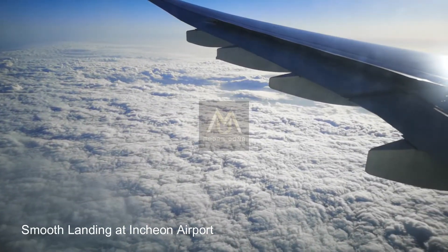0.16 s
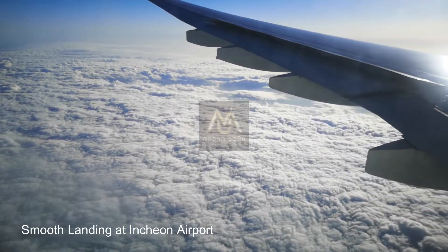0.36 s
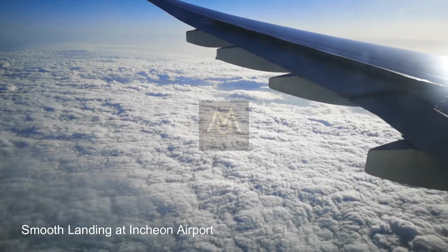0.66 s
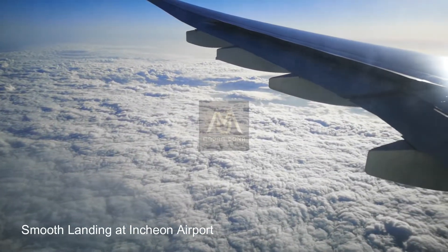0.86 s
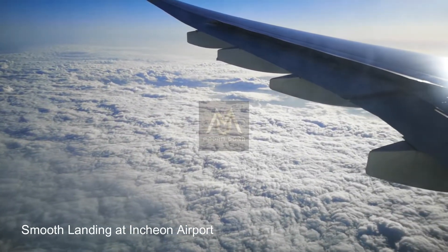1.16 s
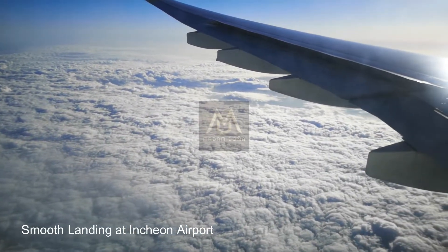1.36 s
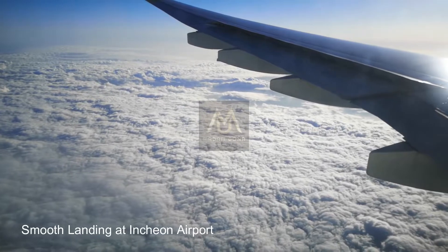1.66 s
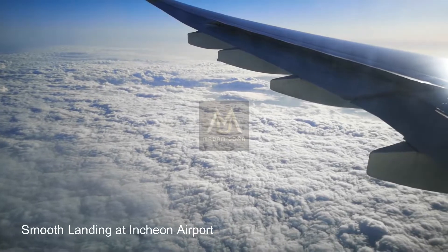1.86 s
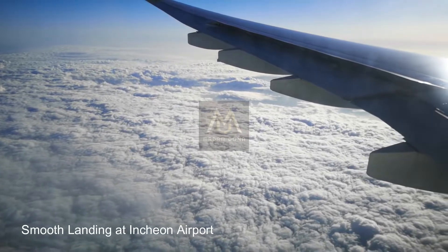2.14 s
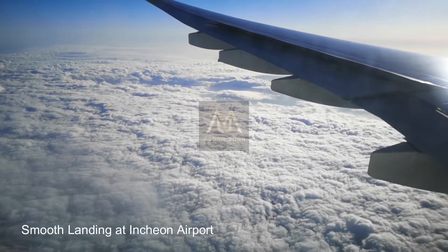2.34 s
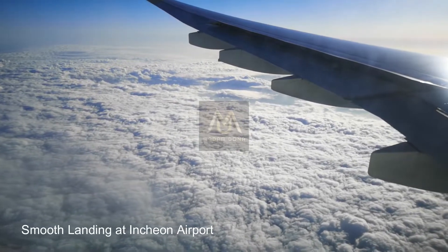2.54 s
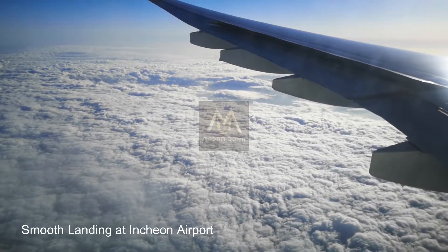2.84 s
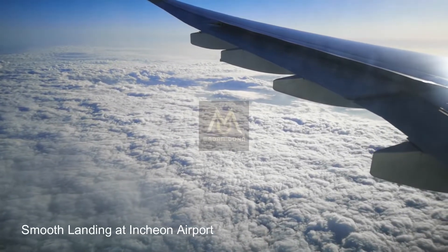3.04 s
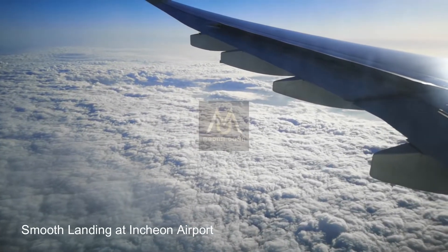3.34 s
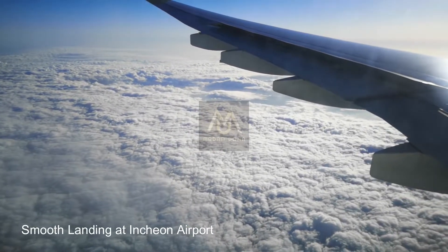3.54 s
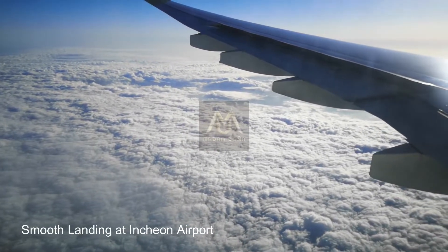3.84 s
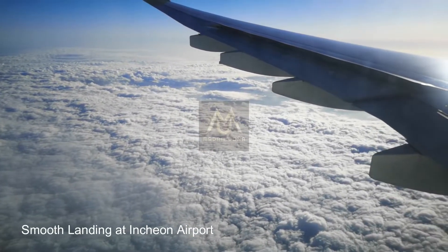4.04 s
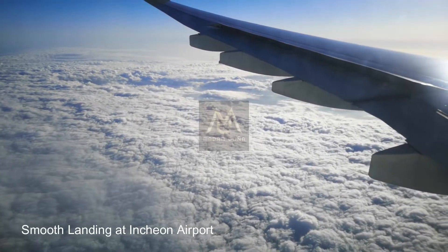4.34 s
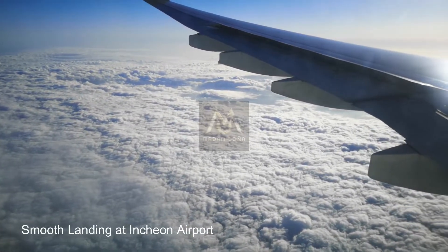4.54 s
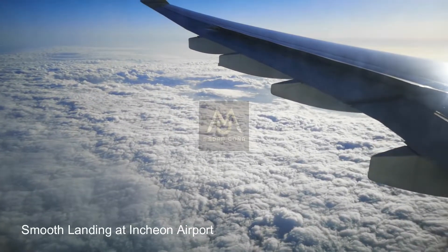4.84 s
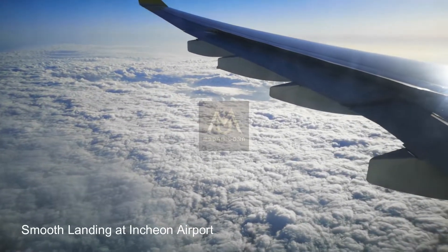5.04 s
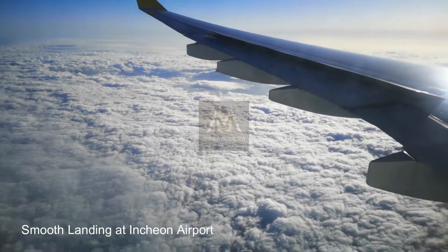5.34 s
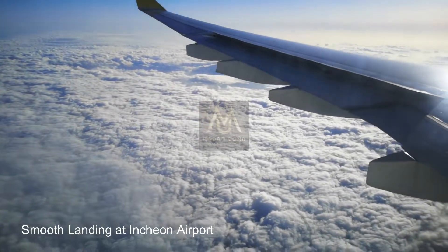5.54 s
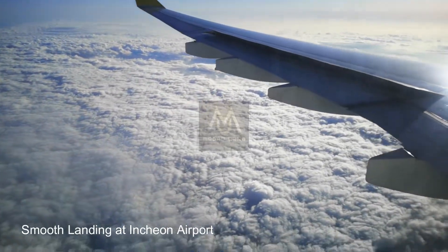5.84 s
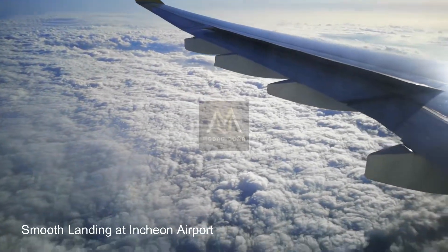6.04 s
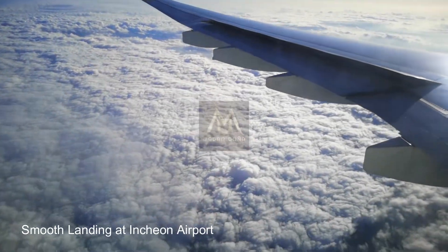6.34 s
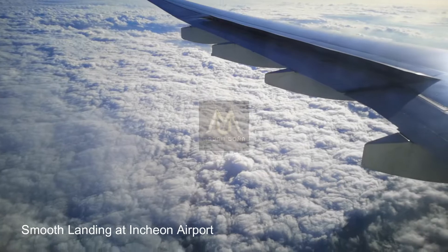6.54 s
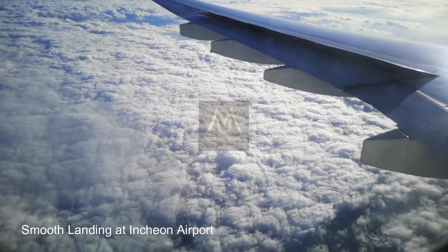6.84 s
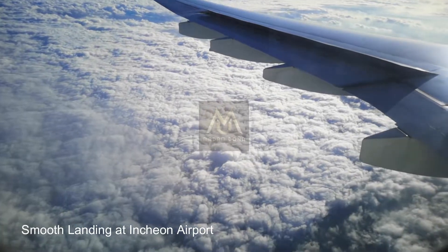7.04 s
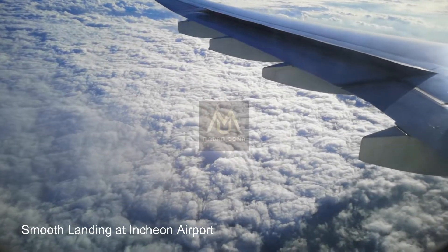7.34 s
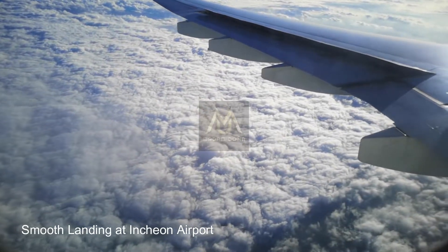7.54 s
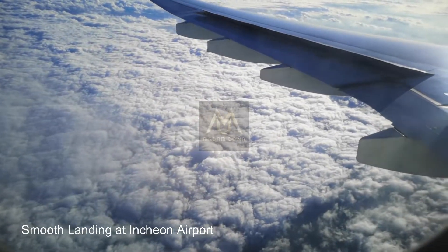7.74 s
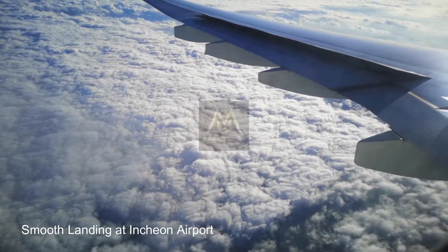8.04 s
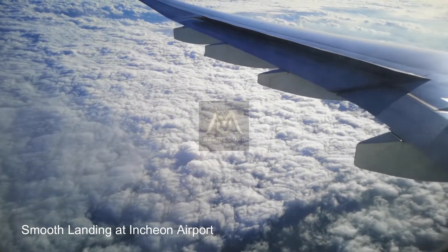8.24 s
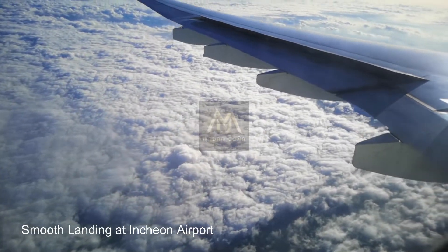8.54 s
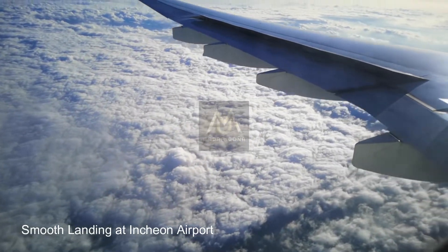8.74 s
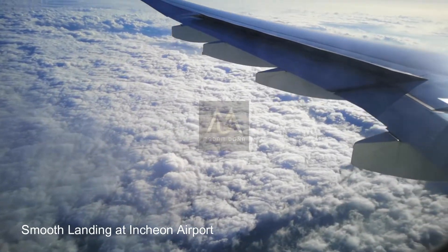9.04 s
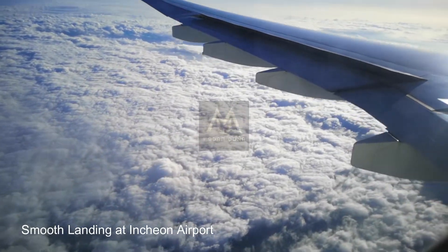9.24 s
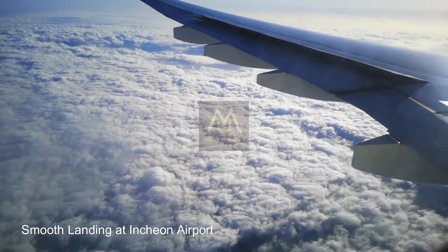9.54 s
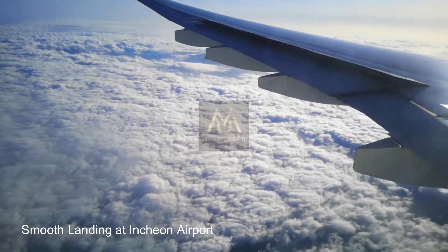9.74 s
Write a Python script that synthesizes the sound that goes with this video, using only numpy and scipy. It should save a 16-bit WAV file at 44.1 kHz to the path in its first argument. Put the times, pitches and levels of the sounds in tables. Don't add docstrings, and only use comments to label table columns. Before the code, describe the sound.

From the first instant to about 9.9 seconds, the deep rumble of jet engines and air rushing along the hull fills a passenger cabin. Most energy is low and boomy, with a far quieter, dull airflow hiss coloured by panel resonances. The first two seconds sag slightly and waver; a sharp heavy gust hits at 2.2, followed by a lull and another short surge near 3. A fuller swell arrives around 4, with smaller bumps at 5.5 and broad ones near 7.2 and 8.5. Faint, smeared ticks of trim or fingers occur around 1.8, 2.6, 4.0 and 4.4, more clearly at 5.0, 5.8, 8.8 and 9.2. Fast automatic gain pumps and softly saturates the rumble, while the stereo bass keeps slipping in phase. Treble is rolled off. The sound ends abruptly on a rising low jolt, stronger on the right.

```python
import sys
import numpy as np
from scipy import signal
from scipy.fft import rfft, irfft, next_fast_len
from scipy.io import wavfile
from scipy.ndimage import uniform_filter1d

SR = 44100
rng = np.random.default_rng(int(sys.argv[2]) if len(sys.argv) > 2 else 0)


def linear_from_db(decibels):
    return 10 ** (np.asarray(decibels, float) / 20)


def master_out(mix):
    frames = np.transpose(np.atleast_2d(mix))
    ceiling = np.clip(frames, -1, 1)
    pcm = np.round(ceiling * 32767).astype(np.int16)
    wavfile.write(sys.argv[1], SR, pcm)


N = 436149

# frequency in Hz, density in dB per Hz.
RUMBLE_HZ_DB = [(8, -23.5), (14, -8.5), (22, -2.5), (34, 4), (52, 0), (72, -6), (97, -6), (140, 1),
                (205, -6), (262, -16), (346, -19.5), (520, -46), (1140, -120)]
# frequency in Hz, density in dB per Hz.
HISS_HZ_DB = [(250, -23), (430, -.5), (528, -9), (665, -9), (986, -16.5), (1250, -21.5), (2180, -23.5),
              (2950, -31), (4300, -37), (6800, -39.5), (8500, -45.5), (10500, -52), (12500, -57.5),
              (15400, -67.5)]
# centre in Hz, width in Hz, left in dB, right in dB.
PANELS = [(745, 45, 5, 2), (1335, 40, 5, 1), (2000, 250, 2, 2), (2650, 150, 4, 3), (5600, 300, 3, 2),
          (7400, 450, 5, 0), (9600, 700, 0, 4)]
# frequency in Hz, left minus right in dB.
PORTS_HZ_DB = [(220, 0), (330, -0.3), (480, 0), (600, 1.5), (790, -3), (1900, -2), (3200, -1.5),
               (5000, 2.5), (8000, 2.5), (9000, -3.5), (10500, -8.5), (12500, -1)]
# frequency in Hz, likeness 0 to 1.
LIKENESS_BY_HZ = [(30, .998), (100, .99), (200, .97), (300, .8), (500, .55), (1000, .3), (4000, .2)]
# middle in seconds, length in seconds, level in dB.
GUSTS = [(0.31, 0.33, -2.5), (0.9, 0.22, -3.5), (1.4, 0.16, -3.0), (2.06, 0.2, -2.7), (2.2, 0.14, 6.5),
         (2.34, 0.4, -3), (2.56, 0.27, -3), (2.86, 0.16, -5.5), (2.96, 0.09, 4.5), (3.1, 0.22, -4),
         (3.97, 0.45, 3), (4.24, 0.12, 1), (4.51, 0.12, -1), (4.65, 0.2, 2), (4.94, 0.55, -1.5),
         (5.41, 0.13, 1.5), (5.6, 0.16, 2), (6.27, 0.19, 1), (6.63, 0.055, -7), (7.2, 0.49, 2),
         (7.64, 0.2, -3.5), (7.84, 0.4, 1), (8.31, 0.16, -3), (8.53, 0.88, 1.5), (8.94, 0.14, -1),
         (9.39, 0.3, -2.5)]
# middle in seconds, length in seconds, level in dB.
HISS_SWELLS = [(0.61, 0.14, 0.1), (2.1, 0.34, 1.1), (2.83, 0.11, 2.5), (3.68, 0.26, -1.6), (3.98, 0.4, -0.1),
               (5.97, 0.22, 1.6), (6.88, 0.3, 1.3), (7.09, 0.28, -2.1), (7.61, 0.22, 0.5), (8.57, 0.11, 3.1),
               (8.79, 0.26, -1), (9.08, 0.2, -1.3), (9.46, 0.15, -0.4), (9.69, 0.16, 3)]
BAND_EDGES_HZ = [68, 120, 180, 270, 400, 650, 1100, 1900, 3200, 5500, 8500, 11500]
BASS_HZ = [40, 90, 150, 220]
# start in seconds, left lead in radians.
SLIPS = [(0.0, 2.4), (0.32, -0.8), (0.6, -1.9), (0.87, 1.8), (1.24, -1.9), (1.34, -1.1), (1.41, 1.3),
         (1.57, -2.0), (2.0, 1.4), (2.12, -2.3), (3.25, 0.3), (3.72, -1.7), (4.55, 2.6), (4.71, -1.5),
         (4.99, 2.8), (5.12, -0.4), (5.5, -1.9), (5.86, -0.0), (6.34, -3.1), (6.78, 2.7), (7.04, 2.2),
         (7.59, -0.5), (7.72, 2.8), (8.38, 1.8), (8.86, -1.7), (9.13, 2.3), (9.22, -0.2), (9.42, 2.9),
         (9.62, -1.6), (9.78, -3.0)]
# start in seconds, length in seconds, left lead in radians,
# upper limit in Hz.
DEEP_STRAYS = [(0.0, 0.03, -2.4, 120), (0.03, 0.17, 1.7, 68), (0.2, 0.08, -1.9, 68), (0.55, 0.08, -0.2, 68),
               (0.64, 0.19, 2.9, 68), (1.05, 0.08, -1.6, 68), (1.24, 0.04, 0.2, 68), (1.5, 0.04, -2.9, 120),
               (2.31, 0.09, -1.2, 120), (2.4, 0.26, -3.0, 120), (2.68, 0.24, -1.9, 270),
               (3.78, 0.04, 2.7, 68), (4.14, 0.05, 3.0, 270), (4.19, 0.1, -1.0, 270), (4.4, 0.05, 2.9, 120),
               (4.85, 0.06, 2.8, 120), (4.99, 0.05, 1.5, 120), (5.24, 0.2, -1.2, 270),
               (5.44, 0.08, -1.3, 68), (5.52, 0.09, -3.0, 120), (5.64, 0.03, -0.4, 68),
               (5.67, 0.05, 1.1, 180), (5.94, 0.13, -2.6, 270), (6.61, 0.07, 0.8, 120),
               (6.88, 0.29, 2.7, 68), (7.38, 0.13, 1.8, 180), (7.51, 0.15, -0.1, 68), (8.86, 0.14, 1.0, 68),
               (9.13, 0.15, 2.5, 68), (9.62, 0.04, 2.1, 68)]
# start in seconds, length in seconds, left lead in radians,
# lower limit in Hz.
BOOM_STRAYS = [(0.1, 0.13, -2.3, 68), (0.59, 0.06, -3.0, 120), (0.73, 0.06, -1.1, 120),
               (1.11, 0.14, 2.4, 68), (1.59, 0.04, -2.9, 68), (1.72, 0.04, -0.1, 68),
               (1.97, 0.03, 2.6, 120), (2.32, 0.08, 1.6, 120), (2.4, 0.27, -1.2, 120),
               (2.48, 0.06, -2.6, 120), (3.11, 0.08, -0.6, 120), (3.19, 0.09, 2.3, 120),
               (3.29, 0.03, -1.7, 120), (3.79, 0.17, -1.0, 68), (4.65, 0.06, -1.1, 68),
               (5.19, 0.03, 2.4, 120), (5.45, 0.05, 1.0, 68), (5.82, 0.12, 1.5, 68), (6.25, 0.1, 3.1, 120),
               (6.5, 0.18, -0.3, 120), (6.79, 0.07, 1.9, 68), (7.04, 0.04, 0.7, 68), (7.2, 0.13, -0.4, 120),
               (7.59, 0.04, -2.0, 120), (7.92, 0.08, -0.3, 68), (8.08, 0.1, -0.7, 68),
               (8.7, 0.03, -2.0, 68), (8.85, 0.12, 0.9, 68), (9.08, 0.12, 2.6, 120), (9.83, 0.06, 0.5, 120)]
# time in seconds, level over the steady hiss in dB at the
# strongest pitch, that pitch in Hz, octaves to 6 dB down.
TICKS = [(1.822, 11, 9300, -0.3), (1.89, 4, 5940, 1.5), (2.607, 7.5, 9400, 0.8), (2.84, 2, 4520, 1),
         (3.05, 1, 7500, 2.3), (3.378, 2.5, 8540, 1.5), (4.04, 12.5, 14000, 0.6), (4.378, 4, 5600, 1),
         (4.394, 6, 5960, 1), (4.41, 9.5, 4770, 0.8), (4.966, 20, 14100, 0.81), (5.19, 8, 12850, .8),
         (5.64, 3, 7540, 0.5), (5.831, 12, 10500, .95), (5.953, 7, 13100, 0.7), (6.84, 5, 11000, 1.5),
         (6.865, 1.5, 6000, 2), (7.655, 7, 12500, .7), (7.85, 2.5, 9000, 1), (8.575, 1.5, 6530, 2.5),
         (8.797, 14.5, 14500, 1.1), (9.204, 21.5, 14500, 1.23), (9.204, 13, 2630, 0.33),
         (9.34, 11, 12500, 0.9), (4.412, 4, 2300, -1)]
# rise in seconds, left height, right height (full scale 1).
LAST_JOLT = (.012, .14, .66)

RUMBLE_RMS_DB, HISS_RMS_DB = -13.5, -43.5
BUFFET_DB_PER_DB, BOOM_DB_PER_DB, HISS_DB_PER_DB, SWELL_DB_PER_DB = 1.8, 0.2, 0.29, 1
PORT_RAD_PER_OCTAVE = 0.19
TICK_LOW_HZ = 1200
PADDED = next_fast_len(N)
HZ = np.maximum(np.arange(PADDED // 2 + 1) * SR / PADDED, 1)


def at_hz(points, hz):
    table_hz, values = np.array(points).T
    return np.interp(np.log(hz), np.log(table_hz), values)


def colour(spectrum, level_db):
    gain = linear_from_db(at_hz(spectrum, HZ))
    return linear_from_db(level_db) * gain / np.sqrt(np.mean(gain ** 2))


def cabin_colour():
    tint_db = np.outer([0.5, -0.5], at_hz(PORTS_HZ_DB, HZ))
    for centre_hz, width_hz, *sides_db in PANELS:
        resonance = 1 / (1 + (2 * (HZ - centre_hz) / width_hz) ** 2)
        tint_db = tint_db + np.outer(sides_db, resonance)
    rumble = colour(RUMBLE_HZ_DB, RUMBLE_RMS_DB)
    hiss = colour(HISS_HZ_DB, HISS_RMS_DB)
    return linear_from_db(tint_db) * np.hypot(rumble, hiss)


def below(hz):
    return 1 / (1 + (HZ / hz) ** 12)


def swells(rows):
    t_s = np.arange(0, N, 64) / SR
    curve_db = np.zeros(len(t_s))
    for middle_s, length_s, height_db in rows:
        phase = np.pi * np.clip((t_s - middle_s) / length_s, -0.5, 0.5)
        curve_db += height_db * np.cos(phase) ** 2
    return np.interp(np.arange(N) / SR, t_s, curve_db)


def drift(rate_hz):
    step = 40
    r = np.exp(-2 * step * np.pi * rate_hz / SR)
    noise = rng.standard_normal(N // step + 2002)
    slow = signal.lfilter([1], [1, -2 * r, r * r], noise)[2000:]
    return np.interp(np.arange(N) / step, np.arange(len(slow)), slow / slow.std())


def slips(hz, glide_s):
    start_s, lead_rad = np.transpose(SLIPS)
    held = lead_rad[np.searchsorted(start_s, np.arange(N) / SR, "right") - 1]
    reaching = [row for row in DEEP_STRAYS if hz < row[3]]
    reaching += [row for row in BOOM_STRAYS if hz > row[3]]
    for stray_s, length_s, stray_rad, _ in reaching:
        held[round(stray_s * SR):round((stray_s + length_s) * SR)] = stray_rad
    glided = uniform_filter1d(np.unwrap(held), size=int(glide_s * SR), mode="nearest")
    return glided + PORT_RAD_PER_OCTAVE * np.log2(hz / BASS_HZ[1])


def evened(pair, span_s):
    power = uniform_filter1d(np.mean(pair ** 2, axis=0), size=int(span_s * SR), mode="reflect")
    return pair * np.sqrt(power.mean() / power)


def cabin_roar(colours):
    shared, own = rfft(rng.standard_normal((2, PADDED)))
    left_gain, right_gain = colours
    alike = np.clip(at_hz(LIKENESS_BY_HZ, HZ), 0, 1)
    left = left_gain * shared
    right = right_gain * (alike * shared + np.sqrt(1 - alike ** 2) * own)
    masks = np.diff([0 * HZ, *map(below, BAND_EDGES_HZ), 1 + 0 * HZ], axis=0)
    buffet_db, swell_db = swells(GUSTS), swells(HISS_SWELLS)
    flutter_db = 0.4 * drift(12.0)
    out = np.zeros((2, N))
    for k, mask in enumerate(masks):
        is_bass = k < len(BASS_HZ)
        lead_rad = slips(BASS_HZ[k], glide_s=0.014) if is_bass else 2.62 * drift(5.6)
        analytic = np.fft.ifft(2 * mask * right, PADDED)[:N]
        turned = (analytic * np.exp(-1j * lead_rad)).real
        band = np.array([irfft(mask * left, PADDED)[:N], turned])
        if is_bass:
            band = evened(band, span_s=0.14)
            level_db = (BUFFET_DB_PER_DB if k == 0 else BOOM_DB_PER_DB) * buffet_db
        else:
            low_edge_hz = BAND_EDGES_HZ[k - 1]
            wander_db = (0.3 if low_edge_hz < 8000 else 2.2) * drift(7.7)
            level_db = flutter_db + wander_db + HISS_DB_PER_DB * buffet_db + SWELL_DB_PER_DB * swell_db
        out += linear_from_db(level_db) * band
    return out


def ticks(colours, smear_s=0.03):
    out, size = np.zeros((2, N)), 4096
    hz = np.maximum(np.arange(size // 2 + 1) * SR / size, 1)
    t = np.arange(size) / SR / smear_s
    ports = np.array([np.interp(hz, HZ, gain) for gain in colours]) * (hz > TICK_LOW_HZ)
    puff = np.sin(np.pi * np.minimum(t, 1)) ** 2
    tail = 0.21 * np.exp(-t / 1.4) * np.minimum(4 * t, 1)
    for time_s, over_db, peak_hz, octaves in TICKS:
        tilt = linear_from_db(2.0 + over_db - 6 * (np.log2(hz / peak_hz) / octaves) ** 2)
        at = round((time_s - 0.006) * SR)
        noise = rfft(rng.standard_normal((2, size)))
        out[:, at:at + size] += irfft(noise * ports * tilt) * (puff + tail)
    return out


def scene():
    colours = cabin_colour()
    return cabin_roar(colours) + ticks(colours)


def top_cut(x):
    return signal.sosfilt(signal.butter(12, 15140, fs=SR, output="sos"), x)


def record(dry, knee_db=-13.0, depth=0.5, release_db_s=150.0, attack_s=0.004):
    t_s = np.arange(N) / SR
    fall_db = release_db_s * t_s
    peak_db = 20 * np.log10(np.abs(dry[0]) + 1e-6)
    level_db = np.maximum.accumulate(peak_db + fall_db) - fall_db
    r = np.exp(-1 / (attack_s * SR))
    cut_db = signal.lfilter([1 - r], [1, -r], depth * np.maximum(level_db - knee_db, 0))
    mix = 1.037 * np.tanh(linear_from_db(2.5 - cut_db) * dry / 0.97)
    mix = mix * np.sin(np.pi / 2 * np.minimum(t_s / 0.006, 1)) ** 2
    rise_s, *heights = LAST_JOLT
    rise = np.cos(np.pi / 2 * np.minimum(t_s[::-1] / rise_s, 1)) ** 2
    mix = mix + rise * (np.array(heights)[:, None] - mix)
    return top_cut(mix)


dry = scene()
out = record(dry)
master_out(out)
```